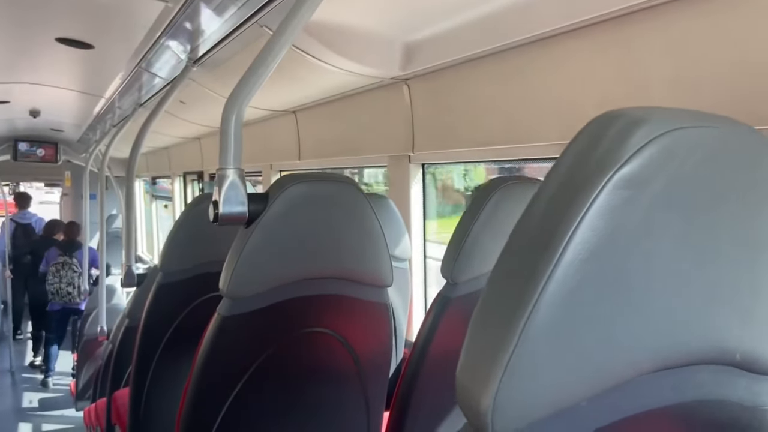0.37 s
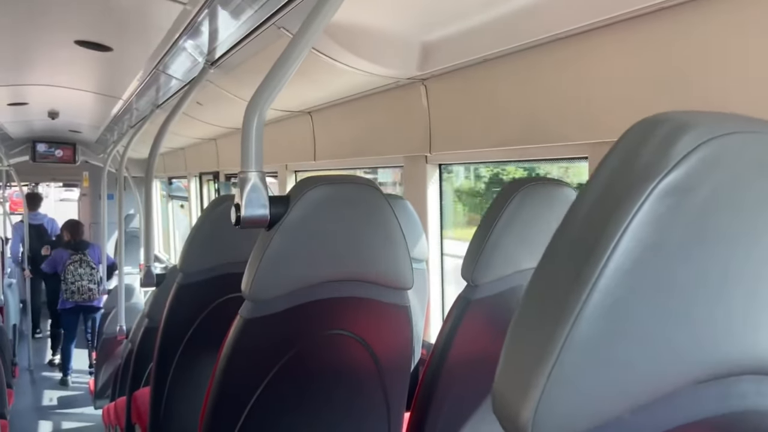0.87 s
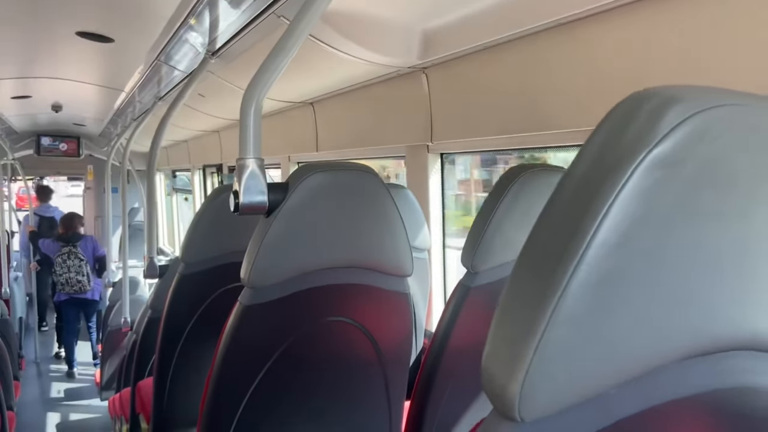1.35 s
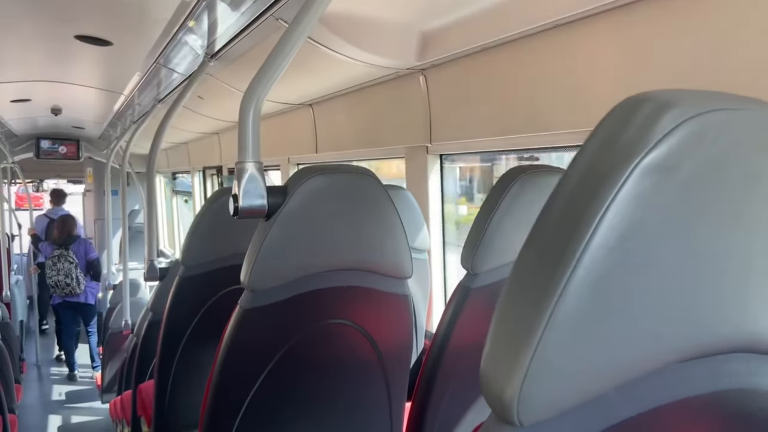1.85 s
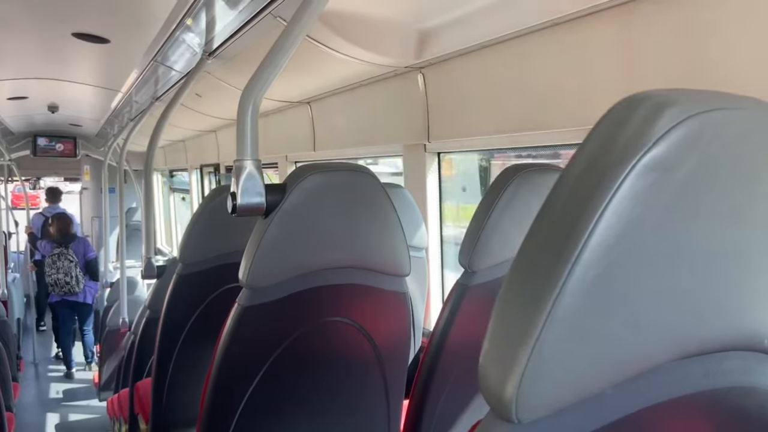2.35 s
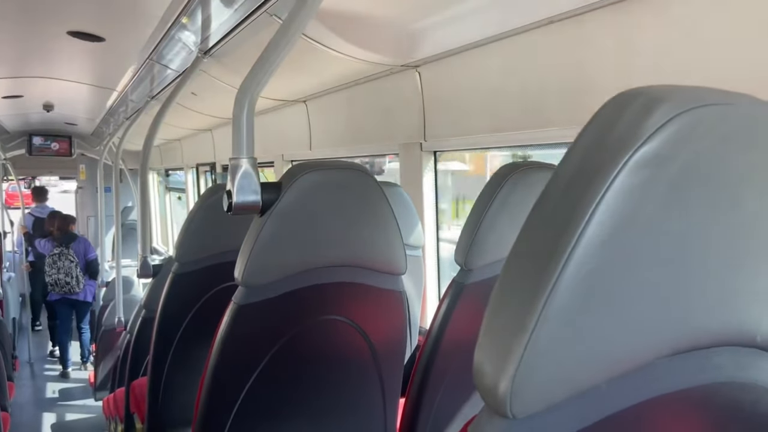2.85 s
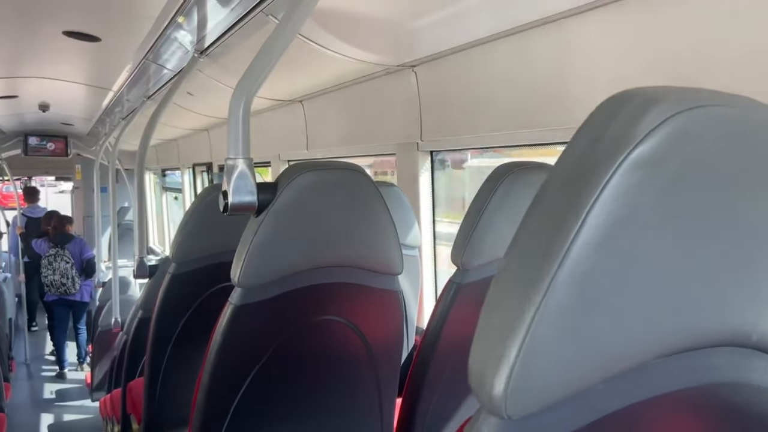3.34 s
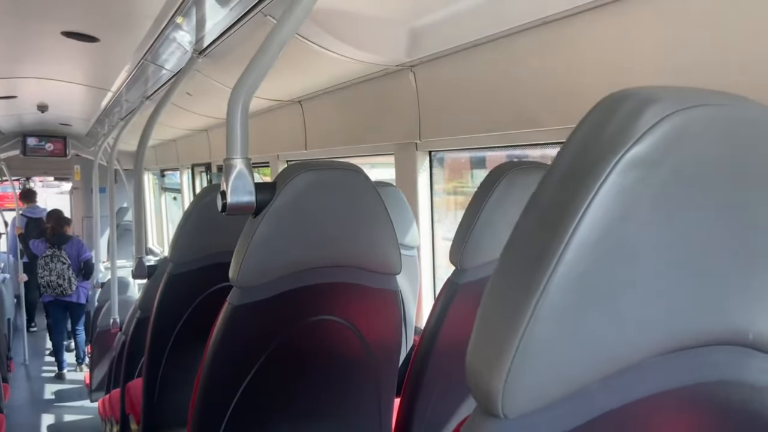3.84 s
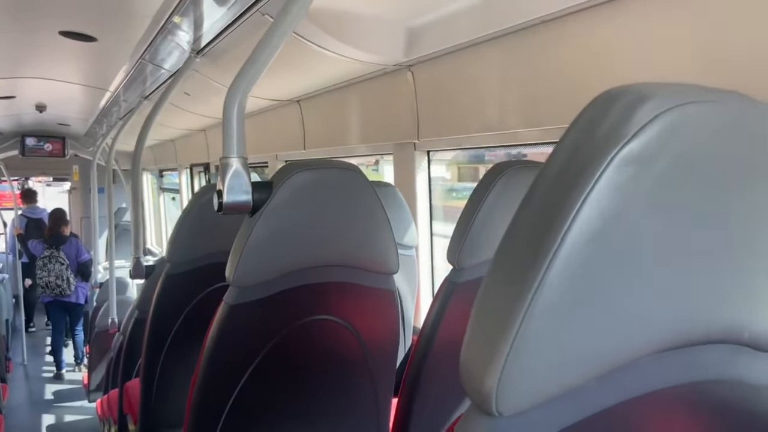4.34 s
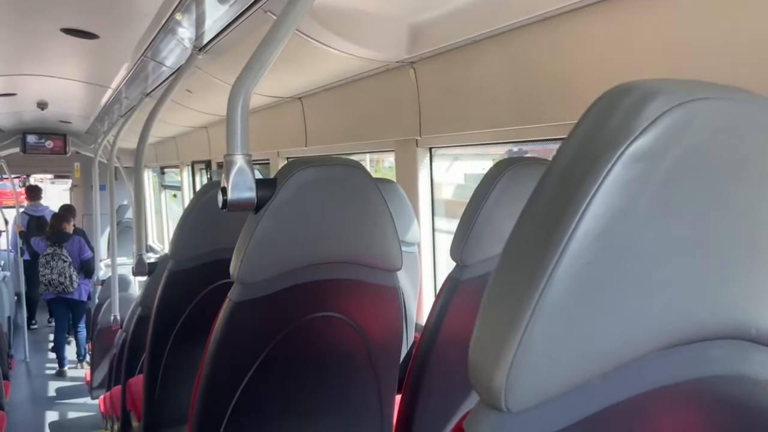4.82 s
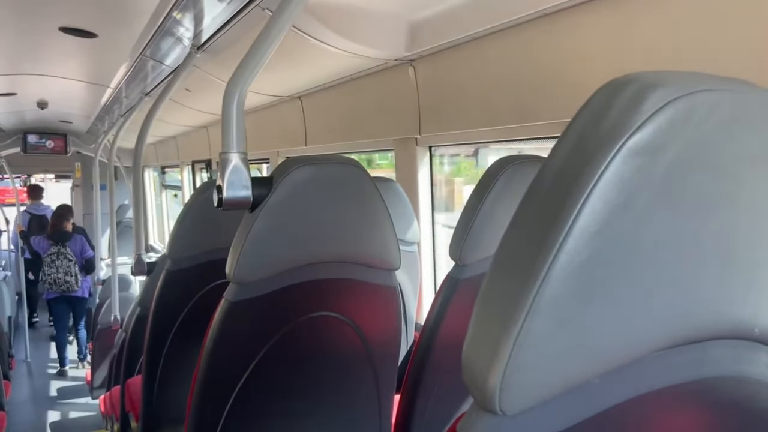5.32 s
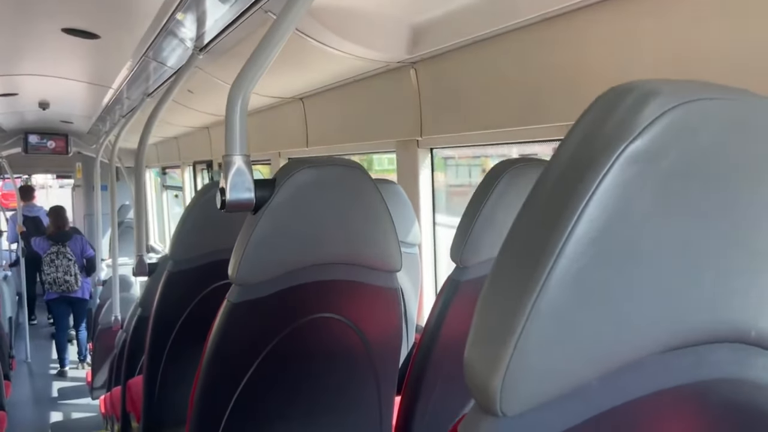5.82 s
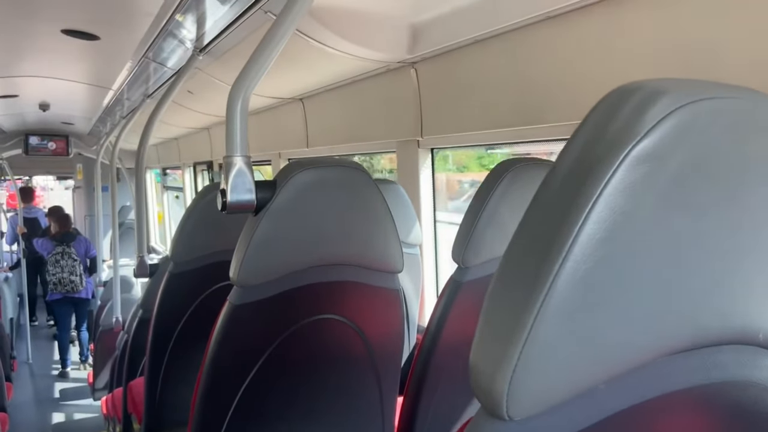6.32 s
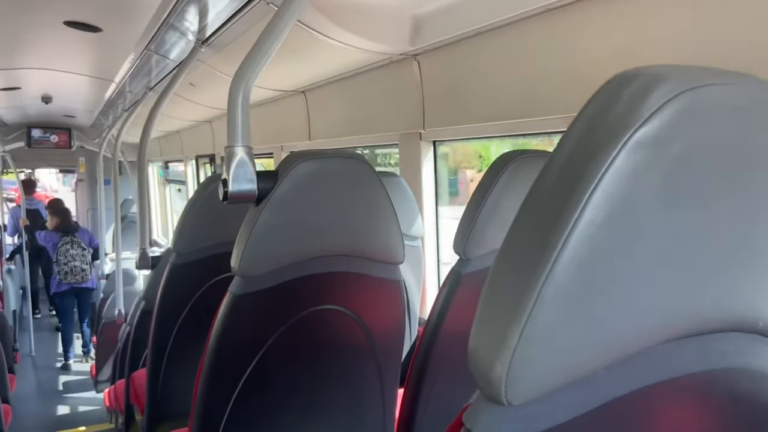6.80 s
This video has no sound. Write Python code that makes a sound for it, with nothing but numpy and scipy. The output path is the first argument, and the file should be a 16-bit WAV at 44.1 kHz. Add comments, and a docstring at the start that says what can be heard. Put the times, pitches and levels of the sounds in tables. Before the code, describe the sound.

Bus saloon rumbles low and steady; seats thump and trim rattles at first, then smooth rolling, an air valve whistles, idle hum, late rattles.

```python
"""The body of a slowing diesel bus, heard from inside the saloon, booms on two low air modes that hum and throb.
Coloured noise makes the shake, rumble, roar, hiss and rattle of the road; a dry joint squeaks in ringing noise.
Fading sines ring the seats and loose trim, noise makes the puffs, and gliding sines make the gear whines.
Late on, a narrow band of noise whistles as an air valve, and sines sound the orders of the idling engine."""
import sys
import numpy as np
from scipy import signal
from scipy.fft import rfft, irfft
from scipy.io import wavfile
from scipy.ndimage import uniform_filter1d

SR = 44100
rng = np.random.default_rng(int(sys.argv[2]) if len(sys.argv) > 2 else 0)


def volts(x):
    """Linear amplitude factor 10**(x/20) for a level x in dB, scalar or array-like."""
    e = np.asarray(x, float) / 20
    return 10 ** e


def store_pcm(level_fs):
    """Save levels as 16-bit WAV."""
    pcm = np.round(np.clip(level_fs, -1, 1) * 32767).astype(np.int16)
    wavfile.write(sys.argv[1], SR, np.atleast_2d(pcm).T)


N = 305613  # samples
T = np.arange(N) / SR  # seconds
HZ = np.fft.rfftfreq(N, 1 / SR)
SIDES = np.array([[1], [-1]])  # left, right

# Road under the wheels, rough at first.
# Each row: time in seconds, floor rumble in dB, tyre roar in dB, trim rattle in dB before jolts.
ROAD_LEVELS = [(0.0, -22.5, -36.5, -49.5), (0.1, -21.5, -30, -40.5), (0.3, -23, -34, -46),
               (0.46, -22.5, -34.5, -46.5), (0.55, -24, -36.5, -51.5), (1.2, -26, -37, -54.5),
               (1.5, -23, -35.5, -51), (2.0, -25.5, -37, -53.5), (3.2, -25, -36, -53.5),
               (3.5, -24, -35.5, -52.5), (4.1, -26, -37, -53.5), (5.0, -25, -37, -55.5),
               (5.9, -23.5, -38, -54), (6.4, -24, -39, -52.5), (6.7, -24, -36, -49),
               (6.93, -24.5, -38.5, -49)]
# Panels and air of the saloon. Each row: frequency in Hz, width in Hz, boost in dB (a dip if negative).
PANEL_MODES = [(110.2, 3.6, 11), (127, 14, 2.5), (164, 13, 1.5), (213.4, 16, 1.5), (271, 21.6, 3.5),
               (376, 15, 4), (436, 5.5, 4.5), (465, 11, 0), (556, 4.6, -6.5), (637, 24, -1), (682, 13, 5.5),
               (787, 10, 3.5), (1078, 35, 2), (1290, 24, 4.5)]
# Resonances of loose trim. Each row: frequency in Hz, width in Hz, boost in dB while rattling.
TRIM_MODES = [(1830, 77, 2), (2100, 130, -4), (2580, 820, 0.5), (3600, 220, 1), (4400, 230, 0.5)]
# How sound differs between the ears.
# Each row: frequency in Hz, left-right likeness from 0 to 1, radians by which the left leads.
EAR_LINKS = [(30, 0.9, 1.5), (55, 0.94, -0.3), (91, 1, 0.74), (147, 0.9, .5), (197.9, 0.73, 0.6),
             (282, 0.8, 0.63), (365, 0.6, 1.27), (468, 0.4, 1.87), (652, 0.53, 3), (800, 0.02, 3.0),
             (1460, 0.3, 3.5), (3030, 0, 5), (8800, 0.07, 9.5)]


def unit(x):
    """Scale to rms 1."""
    return x / np.sqrt(np.mean(x ** 2))


def curves(table):
    """Columns of a (seconds, value, ..) table at every sample."""
    s, *columns = np.transpose(table)
    return [np.interp(T, s, c) for c in columns]


def over_hz(table):
    """A (Hz, value) table at every frequency bin, read along a log scale."""
    hz, value = np.transpose(table)
    return np.interp(np.log(HZ + 1), np.log(hz + 1), value)


def walk(rate):
    """Random levels held for 1 / rate seconds, smoothed twice; rms about 1."""
    k = int(SR / rate)
    held = np.repeat(rng.standard_normal(N // k + 1), k)
    return unit(uniform_filter1d(uniform_filter1d(held, k), k)[:N])


def diffuse(like=None, lead=None):
    """Spectrum of stereo noise as the saloon spreads it: alike in the bass, out of step and unrelated above."""
    # Each row: frequency in Hz, left minus right in dB.
    lean = [(40, -3.5), (110, -3.5), (200, -2), (380, -3), (700, 2.5), (1290, 3.0), (2380, 0.5),
            (4400, 0.5), (8120, 0.5), (15000, -1.5)]
    ears = np.array(EAR_LINKS)
    like = np.clip(over_hz(ears[:, [0, 1]]) if like is None else like, 0, .99)
    lead = over_hz(ears[:, [0, 2]]) if lead is None else lead
    mid, side = rfft(rng.standard_normal((2, N)))
    mixed = np.sqrt(1 + like) * mid + SIDES * np.sqrt(1 - like) * side
    return mixed * np.exp(.5j * SIDES * lead) * volts(SIDES * over_hz(lean) / 2)


def resonance(hz, width):
    """Gain of a steep resonance at every bin."""
    return 1 / (1 + (2 * (HZ - hz) / width) ** 2)


def boosts(modes):
    """Gain of resonances that stand out of, or dip below, a flat response."""
    return volts(sum(db * resonance(hz, width) for hz, width, db in modes))


def coloured(spectrum, modes, lo_hz, hi_hz, flicker_db, rate):
    """Noise in half-octave bands that flicker alone; before that, the ears' mean has rms 1 from lo_hz to hi_hz."""
    bottom, top = spectrum[0][0], spectrum[-1][0]
    noise = diffuse() * volts(over_hz(spectrum)) * boosts(modes) * (HZ > bottom) * (HZ < top)
    place = 2 * np.log2((HZ + 1) / bottom)  # in half octaves
    out = np.zeros((2, N))
    for k in range(int(2 * np.log2(top / bottom)) + 2):
        band = irfft(noise * np.clip(1 - abs(place - k), 0, 1), N)
        out += volts(flicker_db * walk(rate)) * band
    inside = irfft(noise.mean(axis=0) * (HZ > lo_hz) * (HZ < hi_hz), N)
    return out / np.sqrt(np.mean(inside ** 2))


def tone(hz, db, lean_db, lead_s, wobble):
    """A sine whose phase wanders by wobble radians; the left ear hears it lead_s earlier."""
    phase = 2 * np.pi * np.cumsum(hz) / SR + wobble * walk(6) + rng.uniform(0, 2 * np.pi)
    return np.sqrt(2) * volts(db + SIDES * lean_db / 2) * np.sin(phase + SIDES * np.pi * hz * lead_s)


def body_shake():
    """Deep noise below the floor rumble, as the body shakes."""
    # Each row: frequency in Hz, relative level in dB per Hz.
    sway_colour = [(18, -17.5), (25, -13), (34, -8), (45, 1), (55, -7.5), (70, -3.5), (88, -8),
                   (100, -16.5)]
    return volts(-20) * coloured(sway_colour, [], 20, 100, flicker_db=0.65, rate=3.32)


def floor_rumble():
    """Low road noise coloured by the panels, with a wandering level."""
    # Each row: frequency in Hz, relative level in dB per Hz.
    rumble_colour = [(56, -33.5), (95, -3), (108, -10.5), (134, -11), (178, -13), (264, -18.5), (335, -27),
                     (480, -28.5), (620, -58), (1060, -120)]
    floor_db = curves(ROAD_LEVELS)[0]
    noise = coloured(rumble_colour, PANEL_MODES, 108.5, 330, flicker_db=1.5, rate=9)
    return volts(floor_db + 0.91 * walk(22)) * noise


def wind_hiss():
    """Steady high noise of air passing the windows."""
    # Each row: frequency in Hz, relative level in dB per Hz.
    hiss_colour = [(1180, -16.5), (2000, 4), (4160, -10), (5470, -6.5), (7850, -52), (9820, -13),
                   (12000, -37), (13200, -52.5), (13900, -40), (14700, -32), (15600, -49.5)]
    return volts(-55) * coloured(hiss_colour, [], 2350, 7500, flicker_db=0.3, rate=5.6)


def jolts():
    """Extra shake in dB: a quick rise and a slower settling for each jolt."""
    # Each row: start in seconds, strength in dB before the rise and settling (a dip if negative).
    jolt_list = [(.075, 2), (.14, 2), (.2, 4.5), (.29, 4.5), (.365, 1), (.41, 2), (.445, -3), (.5, 4),
                 (.56, -3), (1.439, 4), (3.33, 9), (3.77, 13), (5.49, 21), (6.04, -5), (6.61, 10),
                 (6.83, 10)]
    rise_s, settle_s = 0.0079, 0.04
    shake_db = np.zeros(N)
    for s, db in jolt_list:
        age = np.clip(T - s, 0, None)
        shake_db += db * (1 - np.exp(-age / rise_s)) * np.exp(-age / settle_s)
    return shake_db


def tyre_roar():
    """Tyre noise coloured by the panels; jolts change it a little."""
    # Each row: frequency in Hz, relative level in dB per Hz.
    roar_colour = [(180, -35), (300, -2.5), (416, -7), (551, -2.5), (599, -5), (793, -5.5), (871, -8.5),
                   (965, -6.5), (1460, -14), (2800, -29.5), (3640, -52), (6160, -120)]
    roar_db = curves(ROAD_LEVELS)[1]
    noise = coloured(roar_colour, PANEL_MODES, 324, 2000, flicker_db=1.5, rate=14)
    return volts(roar_db + 0.16 * jolts()) * noise


def trim_rattle():
    """Loose trim ticks on the road: brief shared swells make its noise grainy, and jolts shake it."""
    # Each row: frequency in Hz, relative level in dB per Hz.
    rattle_colour = [(880, -23), (1500, 2), (2620, -3.5), (3190, -9), (4450, -10), (5010, -11),
                     (5470, -9.5), (9290, -24), (10500, -19.5), (15600, -33)]
    rattle_db = curves(ROAD_LEVELS)[2]
    grain = volts(0.88 * walk(70) + 0.46 * walk(15))
    noise = coloured(rattle_colour, TRIM_MODES, 2140, 5800, flicker_db=1.53, rate=20)
    return volts(rattle_db + jolts()) * grain * noise


def joint():
    """A dry joint rubs faintly all along and squeaks at times: the rubbing noise rings a few high modes."""
    # Each row: frequency in Hz, width in Hz, relative level in dB.
    joint_modes = [(5322, 55, 0), (5465, 60, -1), (5650, 90, -1), (5820, 90, -6)]
    # Each row: time of the peak in seconds, length in seconds, level in dB.
    squeaks = [(.1, 0.089, -49), (.39, 0.059, -47), (.66, 0.38, -56), (1.29, 0.12, -51.5),
               (1.42, 0.06, -54), (1.86, 0.25, -52.5), (2.41, .06, -55), (3.22, 0.059, -58),
               (4.23, 0.092, -59), (5.06, 0.074, -58), (5.27, 0.065, -51), (5.65, 0.43, -58),
               (6.63, 0.065, -57), (6.88, 0.11, -57)]
    modes = sum(volts(db) * resonance(hz, width) for hz, width, db in joint_modes)
    rubbing = volts(-65 + 1.8 * walk(3.6))
    for s, length, db in squeaks:
        rubbing += volts(db) * np.exp(-(2 * (T - s) / length) ** 2)
    return rubbing * unit(irfft(diffuse() * modes, N))


def gears():
    """Thin whines, most of them sinking with road speed, whose level wanders with the load on the teeth."""
    # Each row: start and end in seconds, start and end pitch in Hz, start and end level in dB,
    # left minus right in dB.
    whines = [(-.2, 3.6, 973, 945, -44.5, -57, 12), (1.4, 2.45, 1121, 1116, -50, -49.5, 3),
              (2.4, 5.1, 1114, 1093, -53, -56, 3), (2.3, 5.5, 273, 265, -39, -41, -2),
              (3.402, 4.95, 2025, 2060, -55, -56.5, 1), (6.17, 6.55, 986, 971, -42, -39.5, -2)]
    fade_s = 0.18
    out = np.zeros((2, N))
    for t0, t1, hz0, hz1, db0, db1, lean_db in whines:
        fade = np.clip(np.minimum(T - t0, t1 - T) / fade_s, 0, 1)
        hz = np.interp(T, (t0, t1), (hz0, hz1))
        db = np.interp(T, (t0, t1), (db0, db1))
        out += fade * volts(1.3 * walk(5)) * tone(hz, db, lean_db, lead_s=0.00021, wobble=.5)
    return out


def trim_taps():
    """Each tap rings the trim modes near the struck pitch, with its own phase in each ear."""
    # Each row: start in seconds, level in dB, pitch in Hz near which modes are struck hardest.
    tap_list = [(0.079, -40, 1800), (.095, -42, 3000), (.11, -44, 4200), (.145, -42, 2700),
                (.17, -42, 3500), (0.201, -38, 2300), (.21, -40, 3000), (.31, -41, 2500), (.33, -44, 3600),
                (.395, -44, 4200), (0.226, -42, 1803), (.29, -38, 2600), (.37, -43, 2400), (.44, -47, 2100),
                (3.772, -49, 4280), (3.777, -43, 2316), (3.784, -49, 3550), (3.792, -40, 2680),
                (3.815, -39, 2550), (3.845, -39, 1900), (3.895, -44, 2100), (5.494, -35, 2050),
                (5.496, -45.5, 3020), (5.51, -40, 2370), (5.53, -41, 1804), (5.55, -44, 2450),
                (6.531, -51, 4360), (6.566, -49, 4290), (6.595, -45, 4300), (6.7, -46, 4235),
                (6.617, -35, 2640), (6.625, -47, 4292), (6.65, -49, 4300), (6.779, -38, 2990),
                (6.821, -39, 3700), (6.835, -42, 4250), (6.86, -40, 4130), (6.851, -43, 2500),
                (6.868, -34, 2190)]
    # Each row: frequency in Hz, seconds to fade by 60 dB.
    tap_modes = [(1790, .1), (2050, 0.11), (2250, 0.11), (2420, 0.12), (2680, 0.11), (2990, 0.1),
                 (3520, 0.12), (3900, .06), (4080, .07), (4260, 0.15), (4480, .08)]
    reach_octaves, rise_s = 0.14, 0.0013
    out = np.zeros((2, N + SR))
    age = T[:SR // 4]
    all_phases = rng.uniform(0, 2 * np.pi, (len(tap_list), len(tap_modes), 2, 1))
    for (s, db, near), phases in zip(tap_list, all_phases):
        ring = np.zeros((2, len(age)))
        for (hz, t60), phase in zip(tap_modes, phases):
            closeness = np.exp(-(np.log2(hz / near) / reach_octaves) ** 2)
            fading = np.exp(-np.log(1000) * age / t60)
            ring += closeness * fading * np.sin(2 * np.pi * hz * age + phase)
        start = int(s * SR)
        out[:, start:start + len(age)] += volts(db) * (1 - np.exp(-age / rise_s)) * ring
    return out[:, :N]


def bursts():
    """Knocks and puffs: short noisy blows that ring the trim and die away in the saloon."""
    # Each row: start in seconds, level in dB before the rise and decay, low and high band edges in Hz,
    # rise in seconds, seconds to fade by 60 dB.
    burst_list = [(.075, -41.5, 5030, 14800, 0.017, 0.48), (.262, -43.5, 5070, 15000, 0.0086, 0.4),
                  (3.777, -44, 2200, 3100, 0.0037, 0.33), (5.491, -36, 1170, 11150, 0.0014, 0.25),
                  (5.505, -41.5, 1500, 6500, .008, .35), (6.595, -45.5, 3520, 12000, 0.009, .3),
                  (6.613, -35.5, 2450, 12100, 0.012, 0.22), (6.822, -41.5, 3600, 12000, 0.0029, 0.15)]
    trim_power = 2.2  # blows bring out the trim's boosts (in dB) this many times more than rattling does
    out = np.zeros((2, N))
    for s, db, lo_hz, hi_hz, rise, t60 in burst_list:
        age = np.clip(T - s, 0, None)
        grit = volts(3.5 * walk(260))  # uneven contact within a blow
        shape = grit * (1 - np.exp(-age / rise)) * volts(-60 * age / t60)
        band = HZ ** 2 / (HZ ** 2 + lo_hz ** 2) / (1 + (HZ / hi_hz) ** 6) / np.sqrt(HZ + lo_hz)
        noise = unit(irfft(diffuse() * band * boosts(TRIM_MODES) ** trim_power, N))
        out += volts(db) * shape * noise
    return out


def seat():
    """Seats thump over bumps: each blow starts ringing modes, most those near the struck pitch, and a dull thud."""
    # Each row: start in seconds, level in dB, pitch in Hz near which modes are struck hardest.
    thumps = [(0.019, -31, 280), (0.047, -34, 260), (.076, -26, 350), (0.11, -27, 370), (0.144, -21, 220),
              (.175, -25.5, 460), (.2, -25, 400), (0.227, -22, 690), (.289, -17.5, 330), (0.311, -31, 200),
              (.335, -31, 450), (0.365, -16, 160), (.402, -26, 320), (.448, -21.5, 260),
              (0.474, -33.5, 490), (.52, -33, 540), (6.03, -25.5, 950), (6.047, -20.5, 800),
              (6.059, -24, 230), (6.066, -25, 990), (6.078, -26, 240), (6.084, -27.5, 950), (6.1, -34, 800),
              (6.122, -29, 316), (6.615, -23.5, 380), (6.7, -27, 365), (6.77, -31, 335), (6.84, -31, 385)]
    # Each row: frequency in Hz, relative level in dB, seconds to fade by 60 dB.
    seat_modes = [(197, -0.5, 0.19), (237, 4.5, 0.12), (275.6, 4, 0.23), (327.3, 1.5, 0.15),
                  (382, 3.5, 0.14), (439.6, -1.5, 0.16), (551, -7.5, 0.14), (696, -8, 0.097),
                  (785, -1, .12), (890, -5, .15), (990, -1, 0.17), (1070, -7, .15), (1170, -14, 0.14)]
    fall_db_per_octave, rise_s, thud_t60_s = 7.5, 0.0046, 0.14
    lead_share = .55  # a near blow reaches the ears more in step than the diffuse roar
    out = np.zeros((2, N + SR))
    age = T[:SR // 2]
    ears = np.array(EAR_LINKS)
    # the cushion's dull noise
    thud = unit(irfft(diffuse() * resonance(298, 840) * (HZ > 160), N))
    all_phases = rng.uniform(0, 2 * np.pi, (len(thumps), len(seat_modes)))
    for (s, db, near), phases in zip(thumps, all_phases):
        start = int(s * SR)
        ring = np.zeros((2, len(age)))
        for (hz, mode_db, t60), phase in zip(seat_modes, phases):
            gain = volts(mode_db - fall_db_per_octave * abs(np.log2(hz / near)))
            lead = np.interp(hz, ears[:, 0], ears[:, 2]) * lead_share
            wave = np.sin(2 * np.pi * hz * age + phase + SIDES * lead / 2)
            ring += gain * np.exp(-np.log(1000) * age / t60) * wave
        noise = np.roll(thud, -start, axis=1)[:, :len(age)] * np.exp(-np.log(1000) * age / thud_t60_s)
        blow = (1 - np.exp(-age / rise_s)) * (volts(-4) * ring + noise)
        out[:, start:start + len(age)] += volts(db) * blow
    return out[:, :N]


def engine():
    """Clean orders (whole multiples) of the firing rate, heard once the clutch drops the engine to idle."""
    # Each row: time in seconds, firing rate in Hz, levels of the 2nd, 3rd and 4th order in dB.
    idle = [(5.2, 50.63, -42, -47, -38), (5.35, 50.35, -28, -27, -55), (5.7, 49.4, -34, -29.5, -35),
            (6.0, 48.37, -26, -26, -31), (6.4, 46.94, -35, -29, -31), (6.6, 47.9, -44, -26, -33.5),
            (6.78, 50.4, -49, -22.5, -33.5), (6.93, 51.63, -28, -31, -32)]
    hz, *levels_db = curves(idle)
    fade = np.clip((T - 5.1) / 0.1, 0, 1)
    orders = (tone(order * hz, db, lean_db=-2.0, lead_s=-.0001, wobble=0.47)
              for order, db in enumerate(levels_db, start=2))
    return fade * sum(orders)


def valve():
    """Escaping air sings roughly in a narrow jet; its squared pressure gives the octave."""
    jet_hz, jet_width_hz = 7750, 900
    opens_s, eases_s, shuts_s = 4.95, 5.365, 5.51

    def jet_noise(gain):
        """Noise of the jet, partly alike in both ears but out of step, at rms 1."""
        return unit(irfft(diffuse(like=.7, lead=1.83) * gain, N))

    def since(s):
        """Seconds passed after time s."""
        return np.clip(T - s, 0, None)

    skirt = jet_noise(1 / (1 + (2 * (HZ - jet_hz) / jet_width_hz) ** 4))
    core = jet_noise(resonance(7680, 110))
    jet = unit(volts(-0.5 * walk(45)) * (skirt + volts(1.5) * core))
    octave_band = resonance(2 * jet_hz, 2 * jet_width_hz) * (HZ > jet_hz)
    octave = unit(irfft(rfft(jet ** 2) * octave_band, N))
    # the whistle swells, sags slowly, drops, then dies away; the slopes in dB per second add up
    db = -34.5 - 45 * np.clip(1 - since(opens_s) / .09, 0, 1)
    db -= 0.5 * since(opens_s)
    db -= 6.5 * np.clip(since(eases_s) / .015, 0, 1) + 20 * since(eases_s)
    db -= 121 * since(shuts_s)
    return (T > opens_s) * volts(db) * (jet + volts(-21) * octave)


def boom(hz, db, width, lean_db, hum_db, lead_s=-0.00023):
    """One air mode: a wandering hum, and a part rung by road noise that throbs by chance."""
    throb = irfft(rfft(rng.standard_normal((2, N))) * resonance(0, width), N)
    throb = (throb[0] + 1j * throb[1]) / np.std(throb) / np.sqrt(2)
    hum = volts(hum_db) * np.exp(1j * 0.78 * walk(3.0))
    both = throb + hum
    # even out the slow swells, so that the level follows db
    k = int(0.11 * SR)
    power = uniform_filter1d(uniform_filter1d(abs(both) ** 2, k), k)
    both = np.sqrt(2) * both / np.sqrt(power)
    carrier = np.exp(1j * np.pi * (2 * np.cumsum(hz) / SR + SIDES * hz * lead_s))
    return volts(db + SIDES * lean_db / 2) * (both * carrier).real


def booms():
    """The two lowest air modes of the saloon, shaken by the road."""
    # Low mode, then high mode. Each row: width in Hz, left minus right in dB, hum against throb in dB.
    boom_modes = [(8, -3.5, 6.5), (6.3, -5.5, 6)]
    # Wavering pitch and chance swells of each boom.
    # Each row: time in seconds, pitch in Hz, level in dB.
    low_swells = [(0.0, 64.8, -20), (0.31, 58.03, -9.5), (0.37, 58, -23), (0.62, 58.14, -14),
                  (0.71, 57.2, -36), (0.81, 57.3, -12), (1.18, 53.2, -34), (1.23, 54.3, -10.5),
                  (1.52, 60.13, -18), (1.7, 59.95, -14), (1.83, 61.3, -21.5), (1.91, 58, -15),
                  (2.28, 55.46, -18), (2.39, 59.2, -18), (2.45, 60.9, -33), (2.61, 59.13, -12),
                  (2.64, 57.85, -19), (3.11, 62.9, -18.5), (3.22, 59.47, -20), (3.3, 62.3, -19),
                  (3.96, 59.5, -22.5), (4.26, 54.5, -17), (4.4, 54.8, -28), (4.48, 58.55, -25),
                  (4.61, 57.9, -13.5), (4.79, 67.75, -29), (4.92, 66.45, -20), (5.02, 68.0, -22),
                  (5.19, 68.0, -18.5), (5.5, 60.4, -20), (6.14, 59.16, -19), (6.25, 56.7, -26),
                  (6.41, 60.5, -17), (6.5, 65.25, -35), (6.56, 64.7, -16), (6.93, 59.2, -13.5)]
    high_swells = [(0.0, 76.5, -14), (0.06, 77.2, -10), (0.23, 69.7, -31), (0.62, 73.7, -19),
                   (0.73, 83.1, -22.5), (0.98, 81.1, -13), (1.16, 82, -25), (1.35, 80.5, -13.5),
                   (1.66, 81.9, -28.5), (1.89, 79.14, -12.5), (2.45, 79, -21), (2.78, 81.2, -13.5),
                   (2.86, 78.1, -36), (2.93, 78.6, -15), (3.36, 77.2, -19), (3.4, 79.15, -27),
                   (3.47, 81.4, -9), (3.55, 79.9, -23), (3.76, 79.5, -15.5), (4.21, 81.7, -13.5),
                   (4.32, 81.4, -35), (4.4, 80.8, -11), (4.57, 70.9, -31), (4.8, 74.1, -18.5),
                   (4.96, 79.4, -20.5), (5.0, 80.6, -10), (5.11, 71.3, -21), (5.21, 78.4, -14),
                   (5.46, 82.8, -23), (5.52, 78.95, -25), (6.02, 78.3, -18.5), (6.18, 73.6, -29),
                   (6.29, 79.34, -21), (6.48, 78.1, -20), (6.64, 70.6, -19), (6.93, 70.6, -31)]
    low = boom(*curves(low_swells), *boom_modes[0])
    high = boom(*curves(high_swells), *boom_modes[1])
    return low + high


def scene():
    """All sources in the saloon, from the background to the booming body."""
    road = body_shake() + floor_rumble() + wind_hiss() + tyre_roar() + trim_rattle()
    fittings = joint() + gears() + trim_taps() + bursts() + seat()
    return road + fittings + engine() + valve() + booms()


def roll_off(x):
    """The treble ends steeply here."""
    return signal.sosfilt(signal.butter(12, 15780, fs=SR, output="sos"), x)


def record(dry):
    """Rounds the loudest peaks softly and finishes the mix."""
    mix = np.tanh(0.85 * dry) / 0.94
    return roll_off(mix)


dry = scene()
out = record(dry)
store_pcm(out)
```